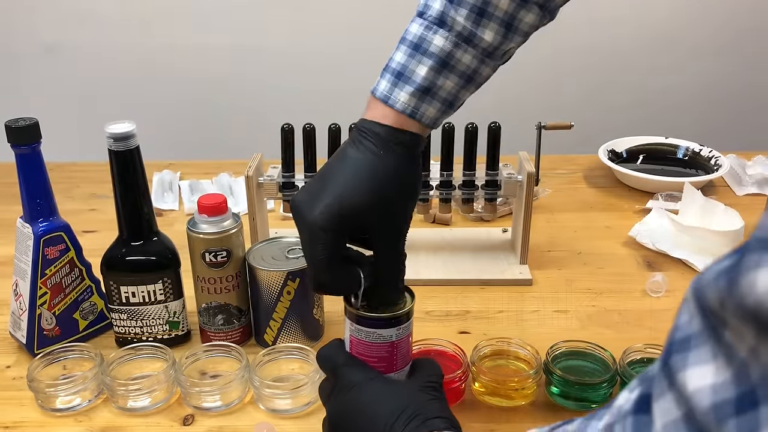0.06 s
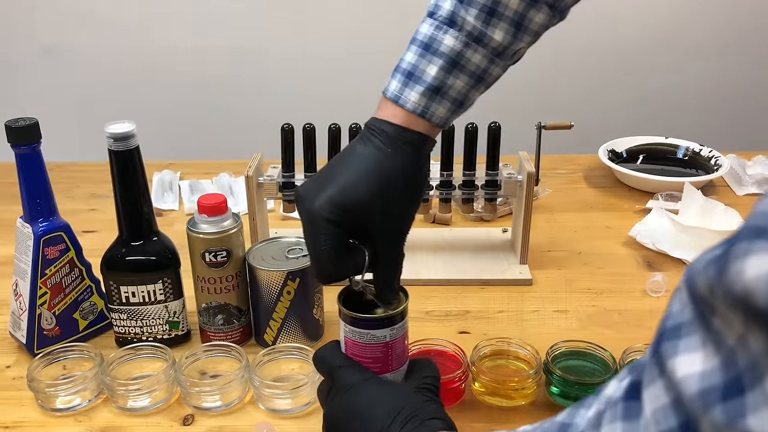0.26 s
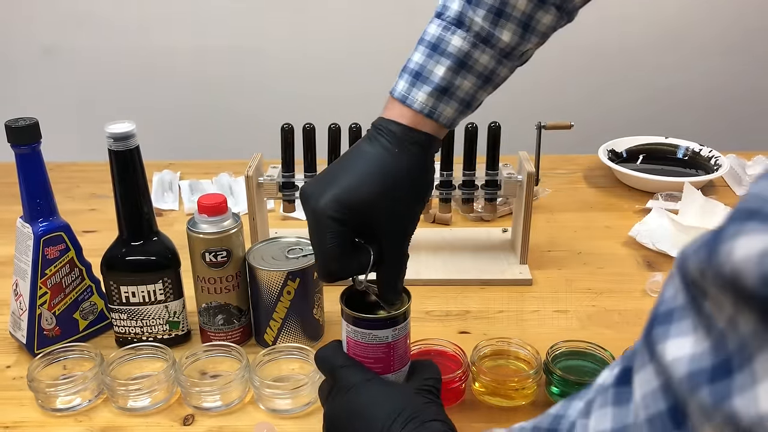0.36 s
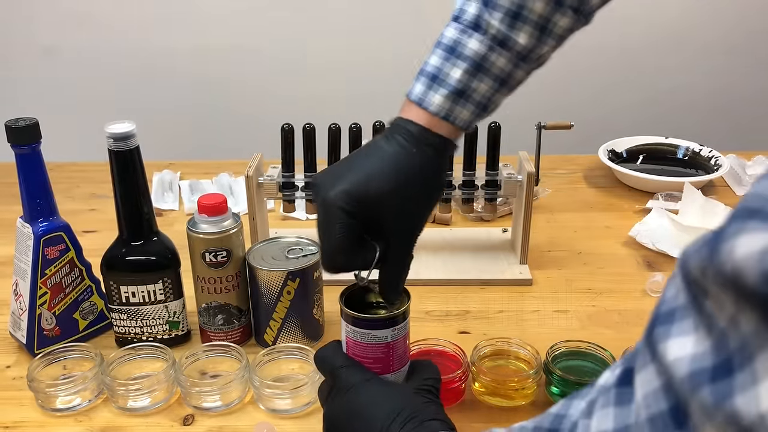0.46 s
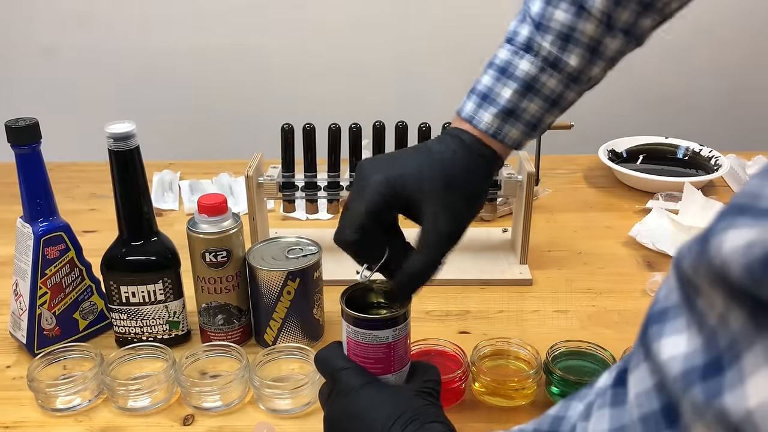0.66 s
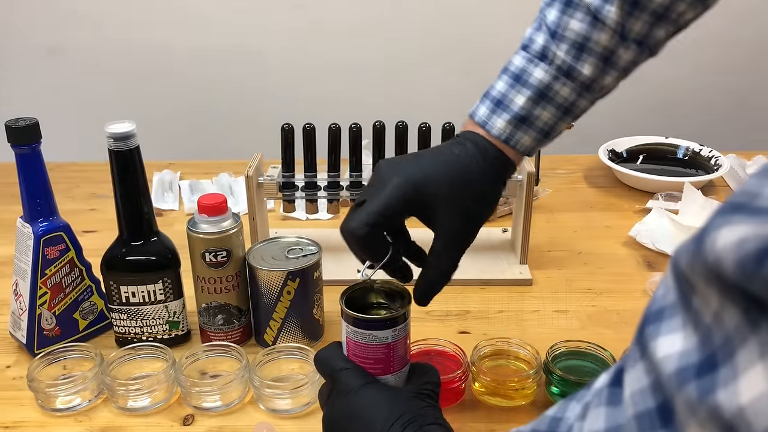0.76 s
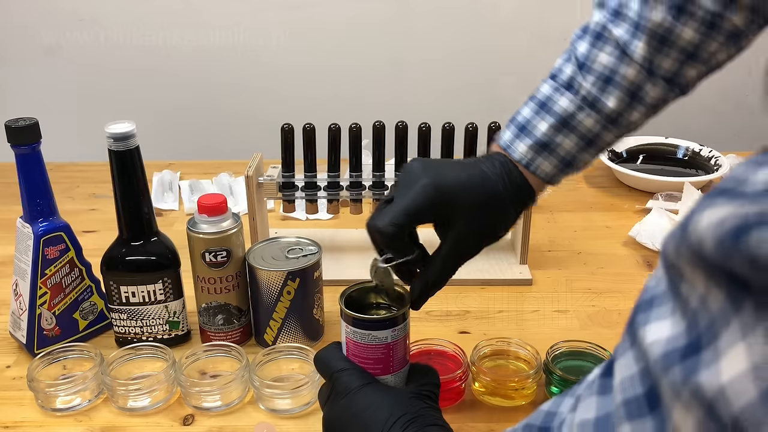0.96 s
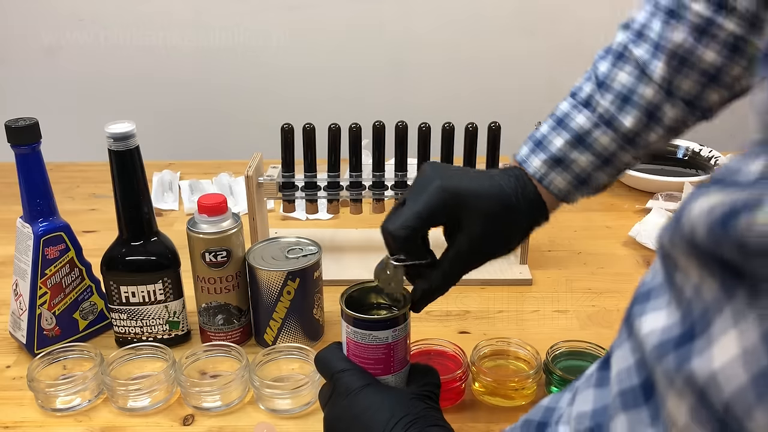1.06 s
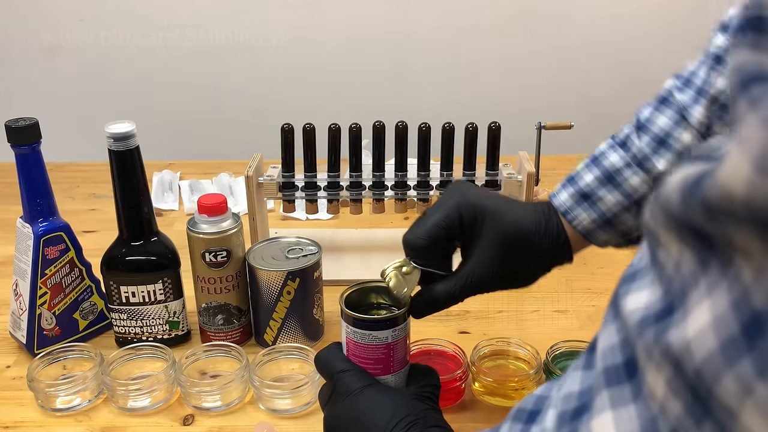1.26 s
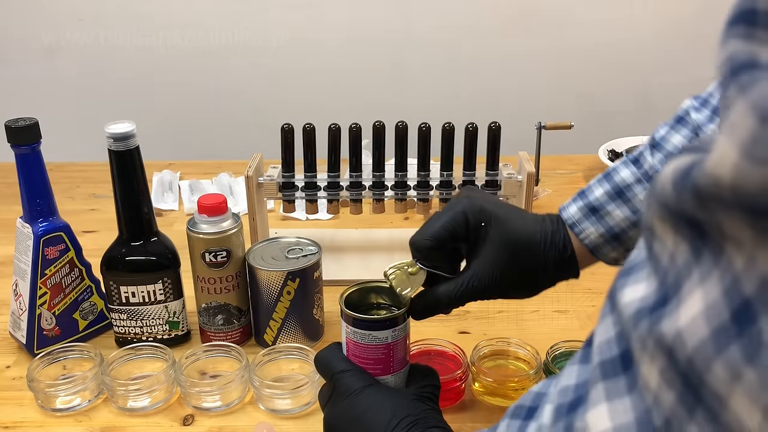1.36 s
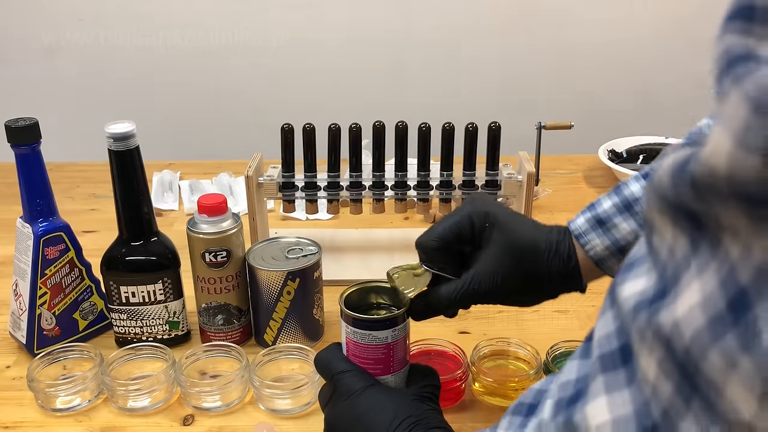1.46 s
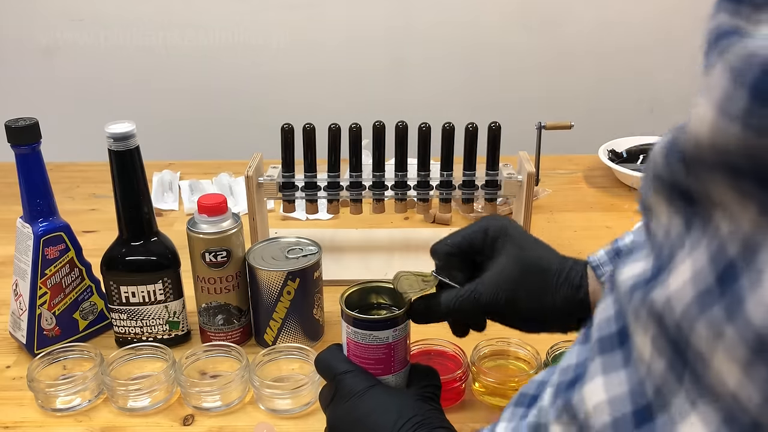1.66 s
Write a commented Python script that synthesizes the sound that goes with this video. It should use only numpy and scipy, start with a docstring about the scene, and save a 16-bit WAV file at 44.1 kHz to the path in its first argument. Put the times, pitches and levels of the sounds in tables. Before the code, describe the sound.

A tin can's ring-pull lid bursts open with a loud, brief tearing crack and hollow pop, thumping the wooden bench; faint ticks and glove rubs follow, then a thin metallic snap, close microphone in a small quiet room.

```python
"""A low wavering hum and faint air noise fill a small room while a glove rubs and two faint pops sound.
A gloved hand pulls the ring of a tin can: the score line tears as grainy noise that rings the lid, the can's
mouth pops as fading tones, and the can jolts a wooden bench, ringing its low modes. The bent lid ticks with
tiny noise bursts and the glove rubs. Later the ring snaps as filtered cracks with a thin ring, and the can is
nudged while the glove rubs again."""
import sys
import numpy as np
from scipy import signal
from scipy.fft import rfft, irfft, next_fast_len
from scipy.io import wavfile
from scipy.ndimage import uniform_filter1d

SR = 44100
rng = np.random.default_rng(int(sys.argv[2]) if len(sys.argv) > 2 else 0)


def generate_wav(signal):
    """Clip the signal to [-1, 1] and save it as 16-bit WAV at the path in sys.argv[1]."""
    frames = np.transpose(np.atleast_2d(signal))
    scaled = np.clip(frames, -1, 1) * 32767
    pcm = np.round(scaled).astype(np.int16)
    wavfile.write(sys.argv[1], SR, pcm)


N = 74970  # length in samples


def amp(db):
    """Turn decibels into a plain multiplier."""
    return 10 ** (np.asarray(db) / 20)


def unit(x):
    """Scale a sound to an rms (average strength) of 1."""
    return x / np.sqrt(np.mean(x ** 2) + 1e-20)


def along(points, hz):
    """Read a value between (Hz, value) points, with pitch on a log axis."""
    point_hz, value = np.transpose(points)
    return np.interp(np.log(hz + 1), np.log(point_hz + 1), value)


def filtered(x, response):
    """Multiply the spectrum of x by a response, which may be complex."""
    size = next_fast_len(len(x) + SR // 2)
    spectrum = rfft(x, size) * response(np.fft.rfftfreq(size, 1 / SR))
    return irfft(spectrum, size)[:len(x)]


def noise(colour, size=N):
    """Random hiss shaped by a colour curve, with an rms of 1."""
    return unit(filtered(rng.standard_normal(size), lambda hz: amp(along(colour, hz))))


def add(track, start_s, sound):
    """Mix a sound into the track from start_s seconds on."""
    part = track[max(round(start_s * SR), 0):][:len(sound)]
    part += sound[:len(part)]


def ringing(modes, rise_s, scatter_db, top_hz=1e5):
    """One blow sets off fading tones of slightly random level; those above top_hz are weakened."""
    t = np.arange(SR * 3 // 4) / SR
    luck = rng.standard_normal(len(modes))
    tones = 0
    for (hz, db, t60), z in zip(modes, luck):
        fade = amp(db + scatter_db * z - 60 * t / t60)
        tones = tones + fade * np.sin(2 * np.pi * hz * t) / (1 + (hz / top_hz) ** 2)
    return tones * (1 - np.exp(-t / rise_s))


def hum():
    """A low tone wanders in pitch and level, with low rumble around it."""
    # the hum over time: time_s [s], pitch_hz [Hz], level_db [dB, tone and rumble together]
    hum_path = [(0.0, 57.5, -56), (0.022, 58.94, -53.5), (0.222, 58.6, -51), (0.292, 60.8, -47.5),
                (0.572, 61.75, -55.5), (0.77, 62.3, -55), (0.936, 61.84, -51), (1.002, 63.34, -59.5),
                (1.04, 62.8, -50.5), (1.088, 62.4, -68.5), (1.116, 61.3, -54), (1.164, 58.5, -69),
                (1.212, 60.06, -49.5), (1.24, 60.05, -59.5), (1.324, 61.4, -57.5), (1.34, 60.8, -67),
                (1.4, 60.6, -54), (1.444, 63.6, -76), (1.466, 63.8, -51), (1.534, 65.4, -71.5),
                (1.58, 65.7, -52), (1.7, 64.2, -59)]
    # rumble colour: pitch_hz [Hz], density_db [dB per Hz, relative]
    rumble_colour = [(25, -32), (40, -4.5), (55, -2), (75, -7), (95, -11.5), (130, -52)]
    rumble_db = -7  # compared with the tone
    time_s, pitch_hz, level_db = np.transpose(hum_path)
    t = np.arange(N) / SR
    cycles = np.cumsum(np.interp(t, time_s, pitch_hz)) / SR
    tone = np.sqrt(2) * np.sin(2 * np.pi * cycles)  # rms 1
    return amp(np.interp(t, time_s, level_db)) * unit(tone + amp(rumble_db) * noise(rumble_colour))


def room_air():
    """The still room is a steady, very quiet coloured noise."""
    # room noise colour: pitch_hz [Hz], density_db [dB per Hz, relative]
    air_colour = [(53, -27.5), (90, 0), (165, -8), (337, -9.5), (603, -16.5), (687, -14.5), (891, -21.5),
                  (992, -17), (1150, -22), (15800, -38)]
    air_db = -64.5
    # the extra first point holds everything below 60 Hz at -40 dB
    return amp(air_db) * noise([(60, -40)] + list(air_colour))


def rubs():
    """Glove and sleeve rubbing: a band of noise, made grainy, swells and sinks softly."""
    # rubs: start_s [s], length_s [s], level_db [dB], centre_hz [Hz], width [octaves]
    rub_list = [(0.0, .07, -72.5, 3900, 0.51), (0.11, 0.06, -75.5, 2000, 0.69),
                (0.578, 0.053, -59.5, 9500, 1.16), (0.645, 0.068, -65.5, 8000, 1.2),
                (0.68, 0.11, -71, 3000, 0.84), (1.36, .1, -69, 3000, 1.22), (1.5, 0.23, -71, 3290, 0.75),
                (1.62, 0.062, -75.5, 2500, .1)]
    out, size = np.zeros(N), SR // 2
    for start_s, length_s, level_db, centre_hz, octaves in rub_list:
        def band_shape(hz):
            return np.exp(-.5 * (np.log2(hz / centre_hz + 1e-6) / octaves) ** 2)

        band = filtered(rng.standard_normal(size), band_shape)
        grain = amp(2.4 * unit(uniform_filter1d(rng.standard_normal(size), size=100)))
        progress = np.clip(np.arange(size) / SR / length_s, 0, 1)
        swell = np.sin(np.pi * progress) ** 0.52
        add(out, start_s, amp(level_db) * unit(band * grain) * swell)
    return out


def pops():
    """Air in the can's mouth puffs as short fading tones that sag in pitch."""
    # air pops, mostly lower as the mouth opens:
    # start_s [s], level_db [dB], pitch_hz [Hz at the start], t60_s [s to fade by 60 dB]
    pop_list = [(0.2178, -22.5, 1475, 0.034), (0.2221, -18.5, 1288, 0.046), (0.2304, -11, 1674, .014),
                (0.2353, -9, 1035, 0.01), (0.2432, -16.5, 759, 0.019), (0.248, -17, 1182, .012),
                (0.064, -55.5, 1510, 0.016), (0.168, -62, 1560, 0.026)]
    out, t = np.zeros(N), np.arange(SR // 10) / SR
    for start_s, level_db, pitch_hz, t60_s in pop_list:
        puff = np.sin(2 * np.pi * pitch_hz * (t - 8 * t * t))  # the squared term sags the pitch
        fade = amp(level_db - 60 * t / t60_s)
        rise = 1 - np.exp(-t / 0.00017)
        add(out, start_s, -fade * puff * rise)
    return out


def room(x):
    """The room answers with a noise tail in which each frequency dies at its own speed."""
    # how long the room rings: pitch_hz [Hz], t60_s [s to fade by 60 dB]
    room_fade = [(150, 0.54), (500, 0.53), (1500, 0.44), (4000, 0.39), (9000, 0.2), (15000, .2)]
    delay_s = .006
    hz, t, z = signal.stft(rng.standard_normal(SR), SR, nperseg=256)
    fade = amp(-60 * t / along(room_fade, hz)[:, None])
    tail = signal.istft(z * fade, SR, nperseg=256)[1]
    late = np.pad(x, (round(delay_s * SR), 0))
    return signal.fftconvolve(late, tail / np.linalg.norm(tail))[:N]


def tear():
    """The score line rips as dense uneven noise, which also makes the lid ring."""
    # strength of the tear over time: time_s [s], level_db [dB]
    tear_path = [(0.191, -43.5), (0.196, -41.5), (0.201, -34), (0.209, -33.5), (0.2145, -21.5),
                 (0.218, -22), (0.218, -24), (0.226, -30), (0.229, -35.5), (.238, -42)]
    # tear colour: pitch_hz [Hz], density_db [dB per Hz, relative]
    tear_colour = [(290, -48.5), (500, -18), (1810, -1), (2280, -9.5), (3220, -3.5), (6090, -14),
                   (6540, -12), (10400, -19), (13300, -14.5), (15800, -23)]
    # lid tones, damped by the glove: pitch_hz [Hz], level_db [dB, relative], t60_s [s to fade by 60 dB]
    lid_modes = [(3367, -5, .05), (3875, -5, 0.038), (4470, -6, 0.17), (6630, -7, 0.087), (9400, -7, .05)]
    grain_db, ring_db = 3, -13  # scatter of the rips; how much they ring the lid
    time_s, level_db = np.transpose(tear_path)
    level = amp(np.interp(np.arange(N) / SR, time_s, level_db, left=-150, right=-150))
    grains = amp(grain_db * unit(uniform_filter1d(rng.standard_normal(N), size=24)))
    rips = level * unit(grains * noise(tear_colour))
    lid = ringing(lid_modes, rise_s=.0003, scatter_db=1)
    return rips + amp(ring_db) * signal.fftconvolve(rips, lid / np.linalg.norm(lid))[:N]


def bench():
    """Every push rings the can and bench; soft, dull pushes ring mostly the low tones."""
    # can and bench-top tones: pitch_hz [Hz], level_db [dB, relative], t60_s [s to fade by 60 dB]
    bench_modes = [(105.6, -17, 0.23), (144.64, 0.5, 0.26), (206.6, -5, 0.12), (264, -12.5, 0.11),
                   (296.5, -11, 0.22), (435.8, -3.5, 0.094), (567, -12.5, 0.091), (711, -12.5, 0.13),
                   (977, -15, 0.08)]
    # pushes of the can: start_s [s], level_db [dB, relative], rise_s [s], top_hz [Hz, weaker above]
    jolt_list = [(0.2334, -17, 0.0052, 4000), (0.515, -47.5, 0.013, 310), (0.584, -46, 0.021, 188),
                 (0.631, -50.5, 0.012, 208), (1.151, -53.5, .01, 306), (1.384, -46.5, 0.005, 1520),
                 (1.40, -42, 0.0037, 1500), (1.414, -41, 0.012, 400), (1.44, -57, 0.02, 312)]
    out = np.zeros(N)
    for start_s, level_db, rise_s, top_hz in jolt_list:
        add(out, start_s, amp(level_db) * ringing(bench_modes, rise_s, 3.0, top_hz))
    return out


def ticks():
    """The bent lid gives tiny bursts of coloured noise that die away fast."""
    # lid ticks: start_s [s], level_db [dB, peak; 4.5 dB above the starting rms], t60_s [s to fade by 60 dB]
    tick_list = [(0.5105, -46.5, 0.026), (0.5431, -44, 0.027), (0.561, -45.5, 0.016),
                 (0.8646, -59.5, 0.0091), (1.377, -53.5, .008)]
    # tick colour: pitch_hz [Hz], density_db [dB per Hz, relative]
    tick_colour = [(880, -11), (1500, 2), (2360, -9.5), (6840, -10.5), (8410, -25.5), (9190, -18),
                   (15800, -26.5)]
    out, t = np.zeros(N), np.arange(SR // 20) / SR
    for start_s, level_db, t60_s in tick_list:
        fade = amp(level_db - 4.5 - 60 * t / t60_s)
        add(out, start_s, fade * noise(tick_colour, size=len(t)))
    return out


def snaps():
    """The ring hits the lid: noise cracks pass through resonances, and thin fading tones ring along."""
    # contacts of ring and lid: start_s [s], level_db [dB, relative]
    snap_list = [(1.125, -53.5), (1.132, -40), (1.1362, -31), (1.14, -25.5), (1.149, -39.5), (1.153, -43.5),
                 (1.162, -50)]
    # tones of the ring: pitch_hz [Hz], level_db [dB, relative], t60_s [s to fade by 60 dB]
    ring_modes = [(4436, 3, 0.17), (4720, -13, 0.33), (6691, -3, 0.23), (7235, -23, 0.082)]
    # resonances that colour the crack: centre_hz [Hz], width_hz [Hz], level_db [dB, relative]
    snap_colour = [(1000, 500, -7), (2710, 420, -3.5), (3650, 170, -9.5), (4530, 180, 4), (7430, 1200, -13),
                   (9290, 600, -12), (11700, 580, -12.5), (14500, 3300, -19)]
    thin_ring_db = -25.5
    cracks, ring, t = np.zeros(N), np.zeros(N), np.arange(SR // 40) / SR
    for start_s, level_db in snap_list:
        fade = amp(level_db - 60 * t / 0.022)
        add(cracks, start_s, fade * rng.standard_normal(len(t)))
        tones = ringing(ring_modes, rise_s=0.00026, scatter_db=1)
        add(ring, start_s, amp(level_db + thin_ring_db) * tones)

    def resonances(f):
        total = 0
        for k, (centre, width, db) in enumerate(snap_colour):
            peak = 1j * f * width / (centre * centre - f * f + 1j * f * width)
            total = total + (-1) ** k * amp(db) * peak  # neighbours have opposite signs
        return total

    return amp(7.0) * filtered(cracks, resonances) + ring


def scene():
    """Mix the can, its room echo, the rubbing, the air and the hum."""
    room_db = -8.5
    can = pops() + tear() + bench() + ticks() + snaps()
    still = hum() + room_air()
    return (can + amp(room_db) * room(can) + rubs() + still)[None]


def record(dry):
    """Keep only the frequencies below a sharp upper limit."""
    top_hz = 15850
    return filtered(dry[0], lambda hz: hz < top_hz)[None]


dry = scene()
out = record(dry)
generate_wav(out)
```